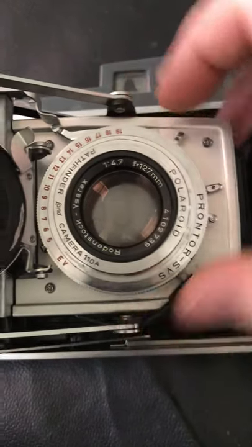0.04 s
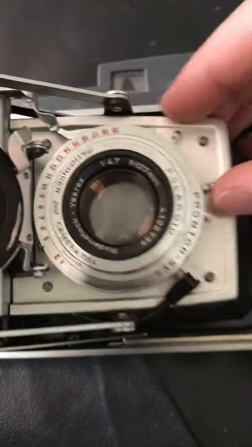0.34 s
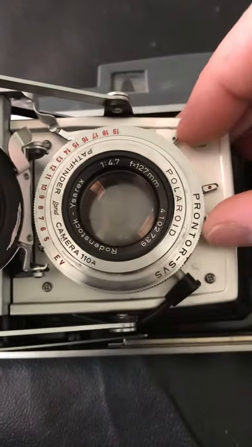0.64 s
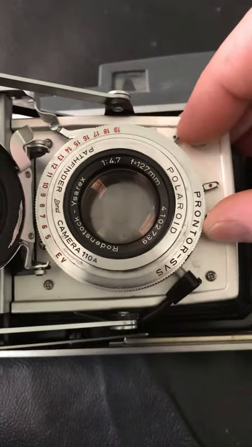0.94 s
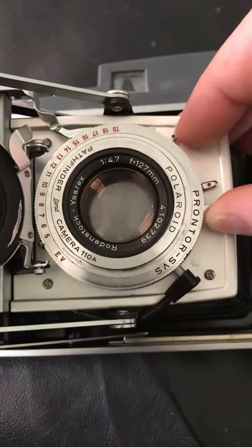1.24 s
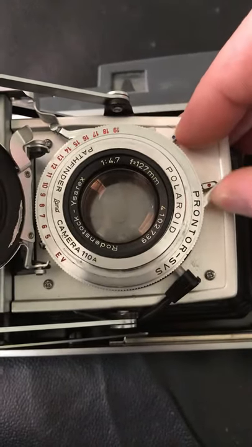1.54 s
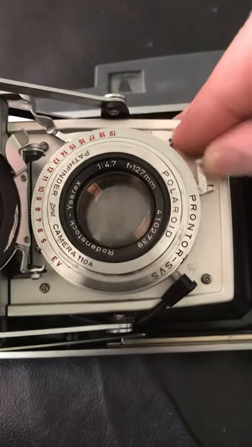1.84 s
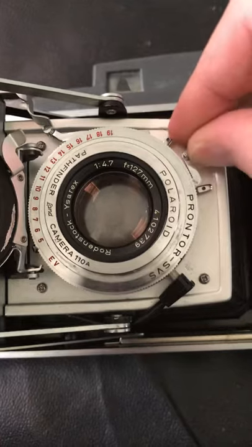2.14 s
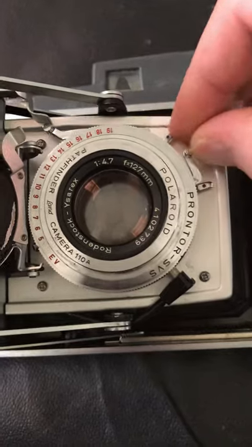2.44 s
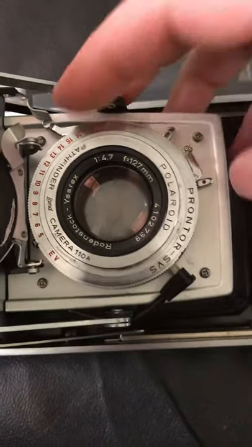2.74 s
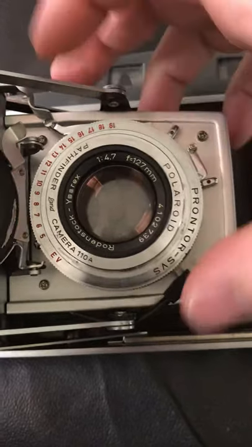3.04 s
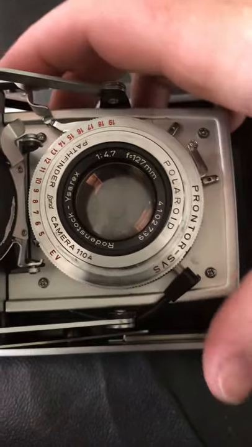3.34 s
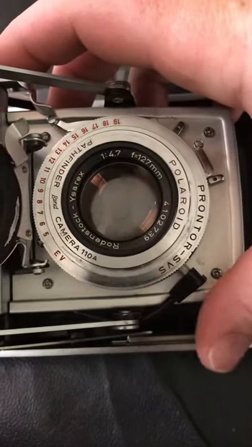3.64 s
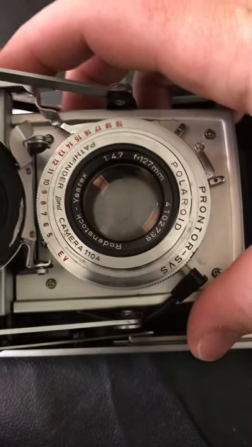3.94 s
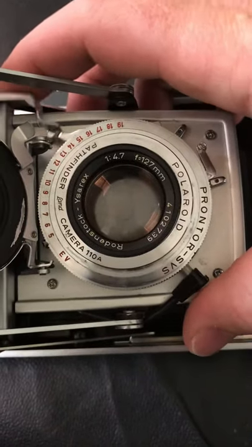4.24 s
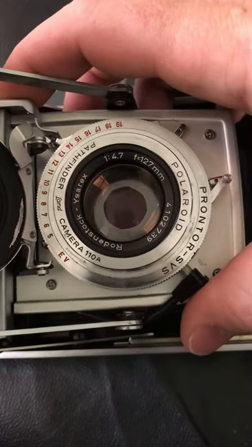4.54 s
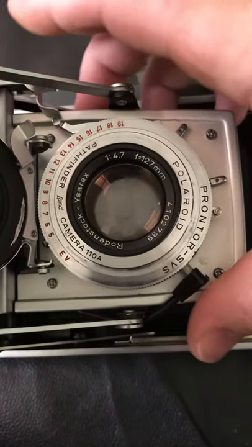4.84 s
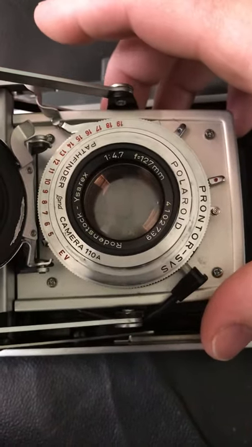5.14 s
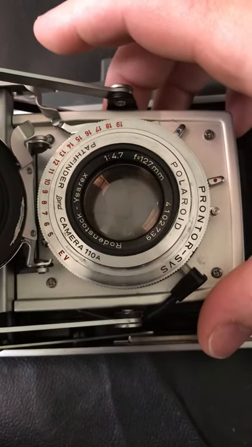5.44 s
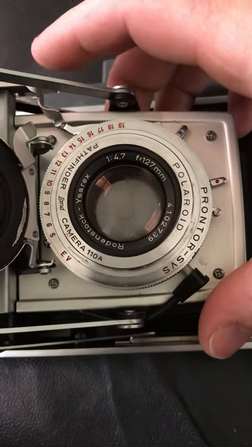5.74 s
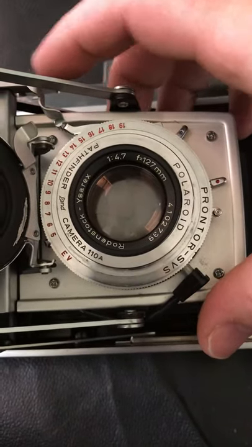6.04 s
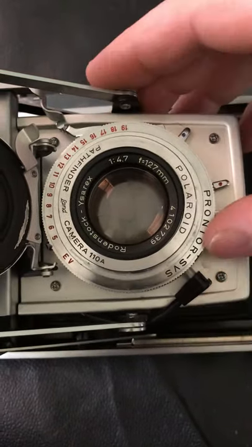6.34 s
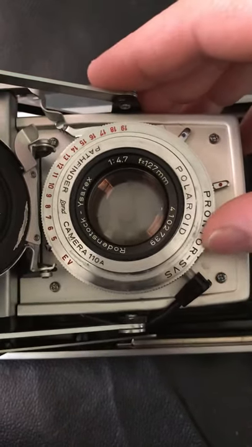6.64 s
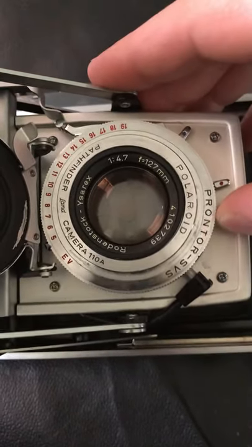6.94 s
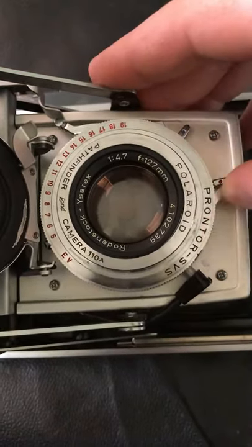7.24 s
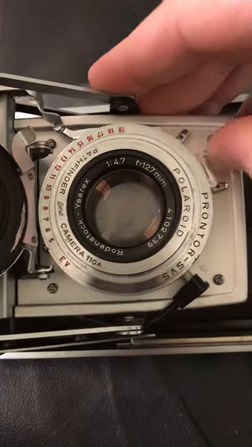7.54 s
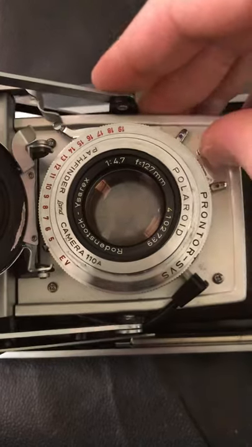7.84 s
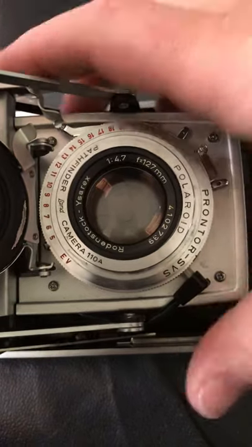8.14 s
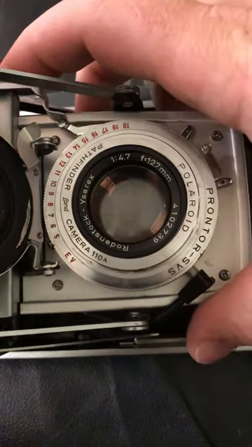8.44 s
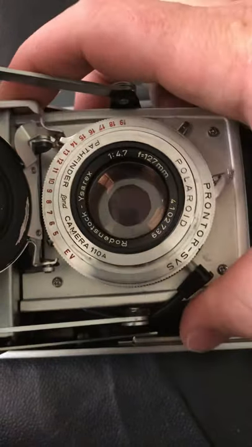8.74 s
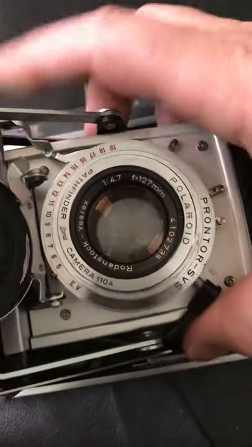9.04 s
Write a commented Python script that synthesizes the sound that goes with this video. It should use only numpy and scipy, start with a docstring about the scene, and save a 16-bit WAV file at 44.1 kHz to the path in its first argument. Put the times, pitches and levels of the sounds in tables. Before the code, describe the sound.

Close up in a quiet room with a faint low rumble, a mechanical camera shutter is worked twice by hand. Each time a lever slides with a thin metallic rasp and a few crisp clicks, then comes a pair of sharp snaps: the steel blades firing with a tiny whirr, and the release returning a third of a second later. Soft finger ticks, skin brushes and dull bumps fill the gaps, and the last snap rings faintly.

```python
"""Light finger ticks and brushes on an old folding camera, close to one microphone in a small quiet room.
Twice a lever rasps along, the leaf shutter is cocked, and the release creaks and trips it: a 60 ms
clatter of steel blades and whirring gears. A third of a second later the release springs back.
Blows ring the steel parts and lens plate; sliding parts make noise in tiny slips. The body bumps on its
pad and scuffs over it just after the second firing. Behind it lie a low rumble and, later, a faint hum."""
import sys
import numpy as np
from scipy import signal
from scipy.fft import rfft, irfft, next_fast_len
from scipy.io import wavfile
from scipy.ndimage import map_coordinates

SR = 44100
rng = np.random.default_rng(int(sys.argv[2]) if len(sys.argv) > 2 else 0)


def pcm_store(signal):
    """Save signal as 16-bit PCM."""
    levels = np.round(np.clip(np.atleast_2d(signal), -1, 1) * 32767)
    wavfile.write(sys.argv[1], SR, levels.astype(np.int16).T)


N = 409688

# each cocking: (finger lands [s], lever breaks free [s], detent [s], latch [s], end stop [s],
# rasp [dB], drag [dB], growth of the drag [dB], force at the stop [dB], pitch of the stop [Hz])
COCKING_MOVES = [(1.062, 1.462, 1.6924, 1.8456, 2.0238, -37, -43.5, 18, -2, 13540),
                 (6.832, 7.125, 7.3755, 7.4937, 7.5545, -40.5, -46.5, 3, 2.5, 4560)]
# spectrum of blows on the hand-held case: (frequency [Hz], level [dB])
HELD_TONE = [(150, -9), (550, -24), (1100, -4.5), (4400, 0.5), (4950, -8.5), (5500, 0.5), (9600, -1.5),
             (10400, -5.5), (12000, 4), (16000, -1)]


def amp(db):
    """Decibels to gain."""
    return np.exp(np.asarray(db) * np.log(10) / 20)


def along(points, hz):
    """(frequency [Hz], value) points read on a log axis."""
    knots_hz, values = np.transpose(points)
    return np.interp(np.log(hz + 1), np.log(knots_hz + 1), values)


def wobble(rate, size=N):
    """A wandering random curve, rate knots a second."""
    knots = rng.standard_normal(int(size * rate / SR) + 4)
    return map_coordinates(knots, [np.arange(size) * rate / SR], order=1)


def coloured(x, tone, lo=0, hi=SR):
    """x given a spectrum between two edges in Hz, at rms 1."""
    hz = np.fft.rfftfreq(len(x), 1 / SR)
    shaped = irfft(rfft(x) * amp(along(tone, hz)) * (hz >= lo) * (hz < hi), len(x))
    return shaped / np.sqrt(np.mean(shaped ** 2) + 1e-20)


def add(track, s, sound):
    """Mix a sound into a track at time s."""
    span = track[max(round(s * SR), 0):][:len(sound)]
    span += sound[:len(span)]


def ring(modes, t):
    """Damped modes (frequency [Hz], level [dB], t60 [s]), each struck at a new strength and phase."""
    hz, db, t60 = np.transpose(modes)[:, :, None]
    envelopes = amp(db + 2 * rng.standard_normal(hz.shape) - 60 * t / t60)
    return np.sum(envelopes * np.sin(2 * np.pi * (hz * t + rng.random(hz.shape))), axis=0)


def metal_blows(blows, tone, snap_t60, plate_t60, snap_db, plate_db, ring_db, spring_db):
    """Blows (time [s], snap [dB], plate [dB], optional pitch [Hz]) ring steel, plate, body and springs."""
    # modes of the steel case, lens plate and springs: (frequency [Hz], level [dB], t60 [s])
    steel_modes = [(3477, -22, .07), (5180, -16, .05), (6748, -16.5, .07), (8720, -19.5, .07),
                   (11884, -16, .06)]
    plate_modes = [(1703, -6, .06), (2069, -11.5, .05), (2819, -16.5, .06)]
    spring_modes = [(813, -35, 0.64), (1227, -55, .9), (4140, -54, .35)]
    body_low_hz, body_top_hz, plate_top_hz = 100, 900, 3000
    out, t = np.zeros(N), np.arange(SR // 2) / SR
    attack = 1 - np.exp(-t / .00022)

    def burst(lo, hi, t60):
        """Crowded modes of one part dying together."""
        grain = coloured(rng.standard_normal(len(t)), tone, lo, hi)
        fade = amp(-60 * t / t60)
        return grain * fade * np.linalg.norm(fade) / np.linalg.norm(grain * fade)

    for s, snap, plate, *pitches in blows:
        # a blow that hardly moves the plate comes from a tiny part, whose modes start higher
        first_hz = np.interp(snap - plate, [18, 30], [plate_top_hz, 5600])
        steel = burst(first_hz, SR, snap_t60) + amp(ring_db) * ring(steel_modes, t)
        lens_plate = burst(body_top_hz, plate_top_hz, plate_t60) + amp(ring_db) * ring(plate_modes, t)
        metal = amp(snap + snap_db) * steel + amp(plate + plate_db) * lens_plate
        # the heavy body knocks dully, growing more slowly than the blow
        body = amp(.56 * plate - 27) * burst(body_low_hz, body_top_hz, t60=.045)
        # the struck part adds its own brief pitch, the higher the shorter
        for hz in pitches:
            part_db = plate + 4 if hz < plate_top_hz else snap - .5
            metal += amp(part_db) * ring([(hz, 0, 1.4 / np.sqrt(hz))], t)
        springs = amp(plate + spring_db) * ring(spring_modes, t)
        add(out, s, (metal + body + springs) * attack)
    return out


def stroke(s, length, db, growth_db, attack_s, release_s):
    """Corners (time [s], level [dB]) of one rub: it sets in, moves by growth_db to db, and fades."""
    end, start_db, fade_db = s + length, db - growth_db, 25
    return [(s - attack_s, start_db - fade_db), (s, start_db), (end, db), (end + release_s, db - fade_db)]


def friction(strokes, tone, rate, spread_db):
    """Tiny slips of uneven size, rate a second, under the level of each stroke."""
    out, t = np.zeros(N), np.arange(SR // 2) / SR
    for corners in strokes:
        s, db = np.transpose(corners)
        slips = rng.standard_normal(len(t)) * amp(spread_db * wobble(rate, size=len(t)))
        envelope = amp(np.interp(s[0] + t, s, db, right=-np.inf))
        add(out, s[0], envelope * coloured(slips, tone))
    return out


def room_tone():
    """The quiet room's low rumble, joined by a faint, slightly unsteady hum."""
    # spectrum of the rumble: (frequency [Hz], level [dB])
    rumble_tone = [(12, -38), (20, -18.5), (60, 2), (91, -4.5), (222, -11.5), (347, -15.5), (542, -22),
                   (1260, -24.5), (1530, -26), (1710, -28), (16000, -37.5)]
    # the hum comes up: (time [s], level [dB])
    hum_levels = [(6.3, -81), (6.9, -60.5), (7.5, -65.5), (9.29, -66)]
    hum_hz, t = 73, np.arange(N) / SR
    hum_db = np.interp(t, *np.transpose(hum_levels), left=-140, right=-140)
    hum = np.sqrt(2) * np.sin(2 * np.pi * hum_hz * t + .5 * wobble(3.4))
    rumble = coloured(rng.standard_normal(next_fast_len(N)), rumble_tone)[:N]
    return amp(-63.7) * rumble + amp(hum_db) * hum


def wall_echo(x):
    """The near walls answer 5 ms after the direct sound, treble dying first."""
    # decay of the room: (frequency [Hz], t60 [s])
    decay_times = [(200, .35), (6000, .22), (15000, .19)]
    hz, t, spectrum = signal.stft(rng.standard_normal(SR // 2), SR, nperseg=256)
    decay = amp(-60 * t / along(decay_times, hz)[:, None])
    tail = signal.istft(spectrum * decay, SR, nperseg=256)[1]
    response = np.pad(tail / np.linalg.norm(tail), (round(.005 * SR), 0))
    return signal.fftconvolve(x, response)[:N]


def squeaks():
    """Faint thin tones swell and fade, their pitch sagging either side of the middle."""
    # each squeak: (time [s], length [s], top pitch [Hz], level [dB])
    arches = [(1.86, .3, 5090, -70), (9.14, .1, 4850, -71)]
    sag_hz_per_s2 = 17000
    out = np.zeros(N)
    for s, length, hz, db in arches:
        t = np.arange(-length / 2, length / 2, 1 / SR)
        pitch = hz - sag_hz_per_s2 * t ** 2
        envelope = amp(db + 3 * wobble(40, size=len(t))) * np.cos(np.pi * t / length)
        add(out, s, envelope * np.sin(2 * np.pi * np.cumsum(pitch) / SR))
    return out


def fingers():
    """Fingers and loose parts tick on the housing, and skin brushes over it."""
    # light touches: (time [s], steel snap [dB], lens plate [dB])
    ticks = [(0.0934, -53, -65), (0.3019, -38.5, -68), (1.1009, -49, -60), (1.5288, -47, -64),
             (1.655, -36, -58), (1.6763, -37, -63.5), (1.7916, -34.5, -68), (2.34, -42.5, -66.5),
             (2.3687, -44, -58.5), (2.5348, -58.5, -62), (2.7892, -57, -54), (3.9435, -57, -69.5),
             (6.1422, -40.5, -74.5), (7.2185, -38, -60), (7.5377, -44.5, -62.5), (7.5954, -51, -50),
             (7.8142, -41, -59.5), (7.849, -36.5, -60), (8.1176, -46.5, -46), (8.3232, -42, -56),
             (8.3451, -49.5, -50.5)]
    # skin strokes: (time [s], length [s], end level [dB], growth [dB], brightness [dB/octave])
    brushes = [(.1, .06, -62, 0, 0), (.22, .08, -52, 10, 0), (2.04, .04, -58, -3, .5),
               (2.79, .06, -61, -5, -1.5), (2.88, .085, -53, 9, 0), (3.09, .1, -60, -2, 2),
               (3.24, .22, -69, -5, -1.5), (4.84, .035, -61, 0, 0), (6.06, .25, -69, 0, -1),
               (6.57, .23, -68, 0, -.5), (8.13, .1, -66, -3, -.5)]
    # spectrum of skin on the housing: (frequency [Hz], level [dB])
    skin_tone = [(250, 1.5), (550, -5.5), (1400, -0.5), (3500, -12), (6500, -8), (16000, -20.5)]
    out = metal_blows(ticks, HELD_TONE, snap_t60=.02, plate_t60=.043,
                      snap_db=5.5, plate_db=5, ring_db=-18, spring_db=-13)
    for *brush, tilt in brushes:
        tone = [(hz, db + tilt * np.log2(hz)) for hz, db in skin_tone]
        out += friction([stroke(*brush, attack_s=.018, release_s=.03)], tone, rate=140, spread_db=2.5)
    return out


def body_on_pad():
    """The body scuffs over its pad; nudged, it gives a few damped cycles blurred by the pad's thud."""
    # the scuff: (time [s], length [s], end level [dB], growth [dB])
    scuff = (8.76, .135, -46.5, -3)
    # spectrum of the scuff: (frequency [Hz], level [dB])
    scuff_tone = [(71, -59), (120, -29.5), (170, -8.5), (546, -14), (617, -3.5), (1070, -4.5),
                  (2150, -16.5), (6240, -27), (16000, -37)]
    # dull knocks: (time [s], level [dB], pitch [Hz])
    bumps = [(1.7076, -42, 320), (1.9131, -48, 280), (2.975, -47, 1100), (3.021, -51, 800),
             (5.795, -52, 190), (6.3005, -46, 297), (7.981, -39, 300), (8.0189, -37, 656),
             (8.7575, -24, 1510), (8.7628, -35, 250), (8.9143, -40.5, 273), (9.0729, -40, 240)]
    out = friction([stroke(*scuff, attack_s=.04, release_s=.055)], scuff_tone, rate=280, spread_db=1)
    t = np.arange(SR // 4) / SR
    for s, db, hz in bumps:
        thud_tone = [(hz / 2, -10), (hz, 0), (hz * 2, -10), (6000, -38)]
        thud = coloured(rng.standard_normal(len(t)), thud_tone, lo=hz / 2)
        cycles = hz * t
        envelope = amp(db - 60 * cycles / 18) * (1 - np.exp(-cycles / .3))
        add(out, s, .6 * envelope * (np.sin(2 * np.pi * cycles) + thud))
    return out


def lever_slide():
    """Metal drags on metal: a rattle under the finger, a rasp breaking free, a drag to the detent."""
    # spectrum of the sliding lever: (frequency [Hz], level [dB])
    slide_tone = [(400, -15.5), (1300, -10), (1700, -0.5), (2000, -5.5), (2400, -6.5), (3100, 0),
                  (3700, -6), (4300, -1.5), (4950, -7), (5300, 1.5), (6200, 2.5), (7400, -2.5), (8700, 1),
                  (10200, -3.5), (11400, 2), (14000, -3.5)]
    rasp_s = .025
    slides = []
    for land, free, detent, _, _, rasp_db, drag_db, growth_db, *_ in COCKING_MOVES:
        drag_s = detent - free - rasp_s
        slides += [stroke(land, length=.055, db=-52.5, growth_db=4, attack_s=.004, release_s=.012),
                   stroke(free, rasp_s, rasp_db, growth_db=0, attack_s=.062, release_s=.04),
                   stroke(free + rasp_s, drag_s, drag_db, growth_db, attack_s=.01, release_s=.085)]
    surges = amp(1.8 * wobble(100))
    return surges * friction(slides, slide_tone, rate=700, spread_db=4)


def cocking_clicks():
    """The lever passes its detent, lifts the pawl, latches and meets its stop; fingers mute the ring."""
    # the parts it strikes: (steel snap [dB], lens plate [dB], pitch [Hz])
    detent = (-29, -47.5, 9600)
    pawl = (-28.5, -41.5, 10800)
    latch = (-19, -28.5, 2420)
    pawl_lead_s = .0056  # the pawl rides over its tooth just before the latch drops
    blows = []
    for _, _, detent_s, latch_s, stop_s, *_, force_db, stop_hz in COCKING_MOVES:
        blows += [(detent_s, *detent), (latch_s - pawl_lead_s, *pawl), (latch_s, *latch),
                  (stop_s, force_db - 21, force_db - 36, stop_hz)]
    return metal_blows(blows, HELD_TONE, snap_t60=.018, plate_t60=.03,
                       snap_db=5, plate_db=3.5, ring_db=-15, spring_db=-9)


def strut_ping():
    """A strut rings with one thin tone as the release seats for the last time."""
    # the strut's mode: (time [s], frequency [Hz], level [dB], t60 [s])
    ping = (9.006, 3230, -55.5, .6)
    s, *mode = ping
    out = np.zeros(N)
    add(out, s, ring([mode], np.arange(SR // 2) / SR))
    return out


def release_return():
    """The sprung release comes free, rubs along its linkage, rushes home, strikes, seats and rattles."""
    # each return: (comes free [s], click [dB], strike [s], strike level [dB], strike pitch [Hz],
    # seats [s], lens plate offset [dB])
    returns = [(4.575, -42, 4.6073, -17.5, 2144, 4.6125, 2.5),
               (8.9607, -25, 8.9937, -6.5, 5500, 9.0022, -1.5)]
    # seating and rebounds: (delay [s], steel snap [dB], lens plate [dB], pitch [Hz])
    seating = [(0, -12, -18, 2325), (.0041, -14.5, -21, 4370), (.018, -36, -40, 12800),
               (.0387, -39, -51, 11320)]
    # spectra of the blows and rush, and of the rubbing linkage: (frequency [Hz], level [dB])
    return_tone = [(150, -14.5), (1350, -9), (1600, 1), (2400, -1), (2900, -5.5), (7500, 0.5),
                   (10400, -6.5), (13000, -2), (16000, -10)]
    rub_tone = [(300, -14), (1700, -5), (4200, 0), (8000, 0), (16000, -10)]
    free_hz, plate_under_db = 3500, 10
    blows, rubs, rushes = [], [], []
    for free, free_db, strike, strike_db, strike_hz, seat, plate_db in returns:
        blows += [(free, free_db, free_db - plate_under_db + plate_db, free_hz),
                  (strike, strike_db, strike_db - plate_under_db + plate_db, strike_hz)]
        blows += [(seat + delay, snap, plate + plate_db, hz) for delay, snap, plate, hz in seating]
        rubs += [stroke(free, seat - free, db=-35.5, growth_db=0, attack_s=.012, release_s=.06)]
        rushes += [stroke(strike, seat + .005 - strike, db=-20, growth_db=4, attack_s=.018, release_s=.011)]
    clack = metal_blows(blows, return_tone, snap_t60=.02, plate_t60=.022,
                        snap_db=3.5, plate_db=.5, ring_db=-10, spring_db=2)
    rub = friction(rubs, rub_tone, rate=600, spread_db=3.5)
    rush = friction(rushes, return_tone, rate=600, spread_db=4)
    return clack + rub + rush


def shutter_firing():
    """The squeezed release creaks until it trips, the blades fly and the gears run down to their stop."""
    # each firing: (trip [s], steel offset [dB], gear run [s], squeeze before the trip [s],
    # last creak before the trip [s], gap between creaks [s], creak [dB])
    firings = [(4.2535, 0, .0552, .24, .027, .0335, -50.5), (8.6672, -0.5, .0605, .08, .013, .029, -43)]
    # blows of the blades: (delay [s], steel snap [dB], lens plate [dB], pitch [Hz])
    blades = [(0, -12.5, -21.5, 2360), (.0166, -12.5, -17.5, 9500), (.0226, -8.5, -18.5, 2370),
              (.0301, -18, -26, 1680), (.0381, -22.5, -34, 9100)]
    # the gears stop, then settle: (delay [gear runs], steel snap [dB], lens plate [dB], pitch [Hz])
    gear_stops = [(1, -19.5, -44, 13500), (1.73, -34.5, -55, 14900)]
    # spectra of blades and gears, and of the creak: (frequency [Hz], level [dB])
    fire_tone = [(300, -18), (830, -15.5), (1060, -5), (2370, -1), (2750, -5.5), (4900, -5.5), (6000, -3),
                 (7900, -4), (8800, 2), (9650, 2), (10300, -10), (11500, -0.5), (16000, -5.5)]
    creak_tone = [(400, -14), (2000, -4), (3500, -8), (7500, -3), (9100, 5), (9900, -10), (13000, -9),
                  (16000, -14)]
    peak_s, creak_rise_db_per_s = .022, 70
    blows, gears, creaks = [], [], []
    for trip, steel_db, run, squeeze, last_creak, gap, creak_db in firings:
        chain = blades + [(runs * run, *rest) for runs, *rest in gear_stops]
        blows += [(trip + delay, snap + steel_db, plate, hz) for delay, snap, plate, hz in chain]
        # the whirr peaks with the blades, then the gears run on and settle
        gears += [stroke(trip + .002, peak_s, db=-17.5, growth_db=7, attack_s=.003, release_s=.022),
                  stroke(trip + peak_s, run - peak_s, db=-29, growth_db=-2, attack_s=.005, release_s=.02),
                  stroke(trip + run, .75 * run, db=-51, growth_db=0, attack_s=.005, release_s=.015)]
        # the release slips at even gaps, louder as the trip nears
        for lead in np.arange(last_creak, squeeze, gap):
            slip_db = creak_db - creak_rise_db_per_s * lead
            creaks += [stroke(trip - lead, .012, slip_db, growth_db=0, attack_s=.016, release_s=.02)]
    clatter = metal_blows(blows, fire_tone, snap_t60=.014, plate_t60=.017,
                          snap_db=3, plate_db=2, ring_db=-6, spring_db=-10)
    whirr = friction(gears, fire_tone, rate=900, spread_db=5.5)
    creak = friction(creaks, creak_tone, rate=700, spread_db=3)
    return clatter + whirr + creak


def scene():
    """The camera right at the microphone, its echo far below it and the room tone behind, in mono."""
    handling = squeaks() + fingers() + body_on_pad()
    mechanism = lever_slide() + cocking_clicks() + strut_ping() + release_return() + shutter_firing()
    camera = handling + mechanism
    return (room_tone() + amp(-25) * wall_echo(camera) + camera)[None]


def record(dry):
    """The recorder rounds off the highest peaks and cuts the treble above its band limit."""
    rounded = dry / (1 + np.abs(dry) ** 6) ** (1 / 6)
    lowpass = signal.firwin(301, cutoff=15950, fs=SR, window="blackman")
    return signal.fftconvolve(rounded, lowpass[None], mode="same", axes=1)


dry = scene()
out = record(dry)
pcm_store(out)
```